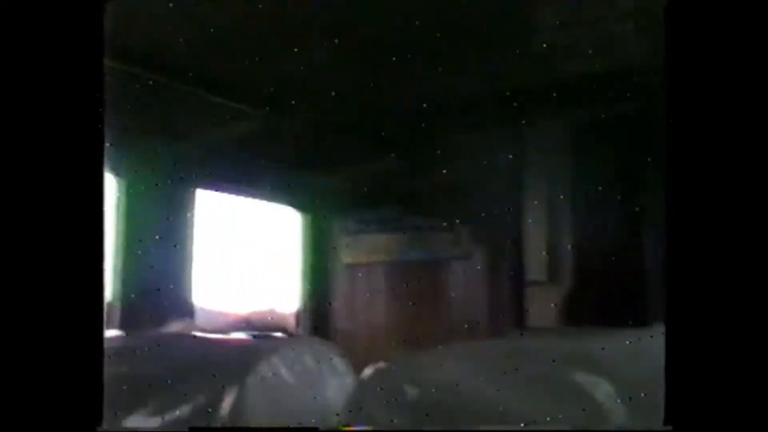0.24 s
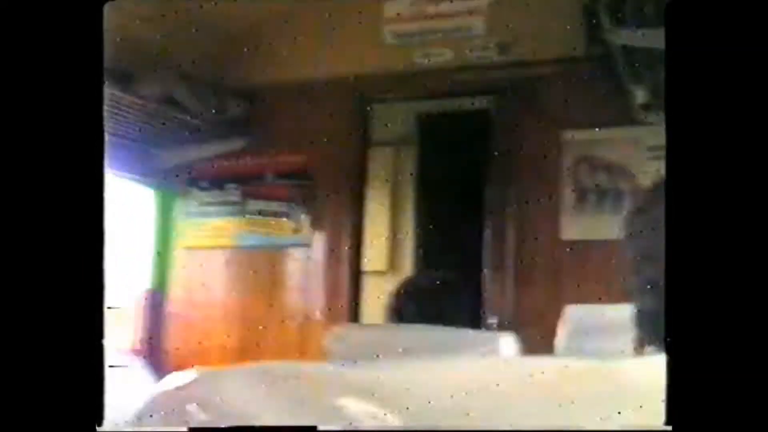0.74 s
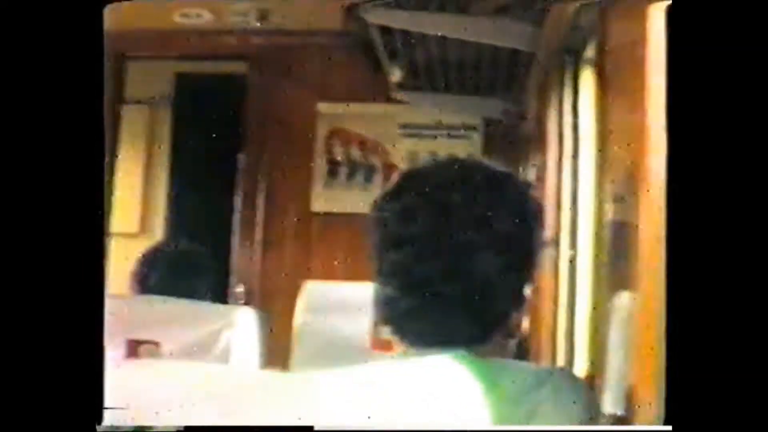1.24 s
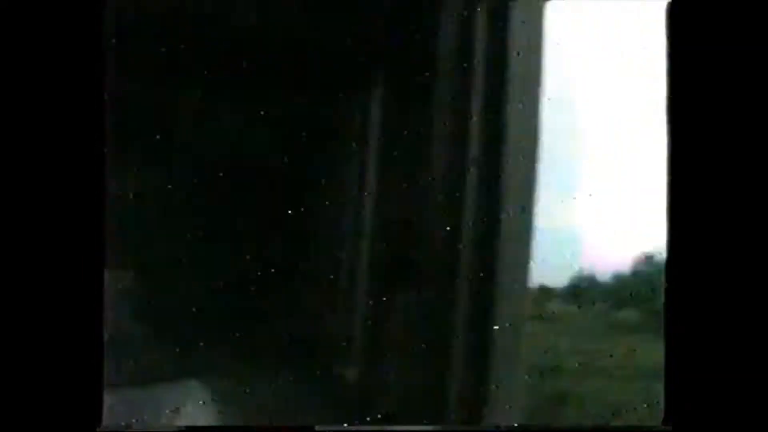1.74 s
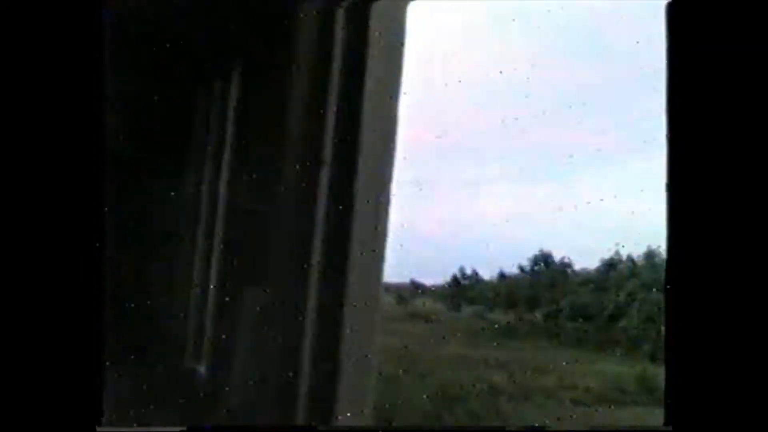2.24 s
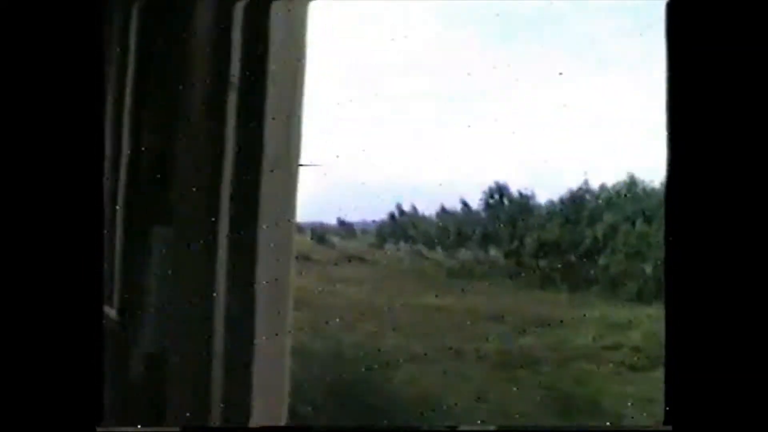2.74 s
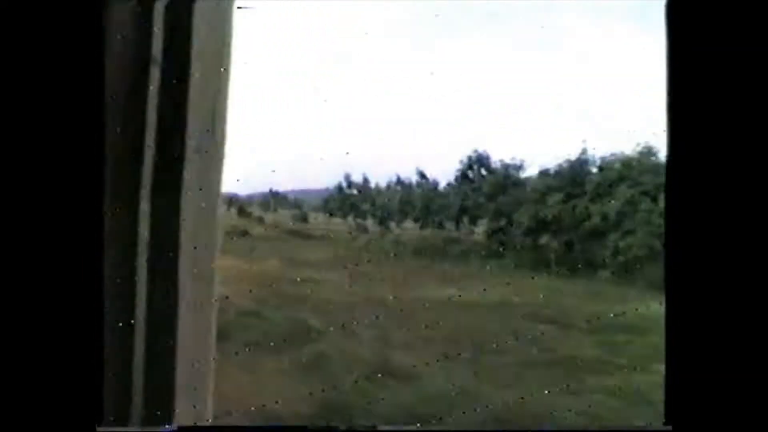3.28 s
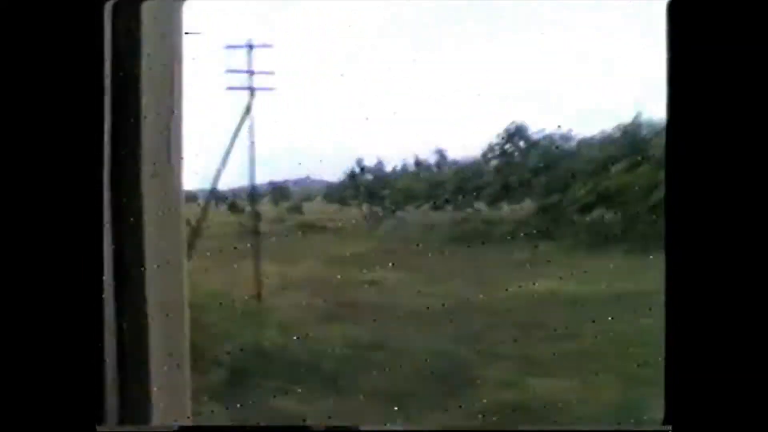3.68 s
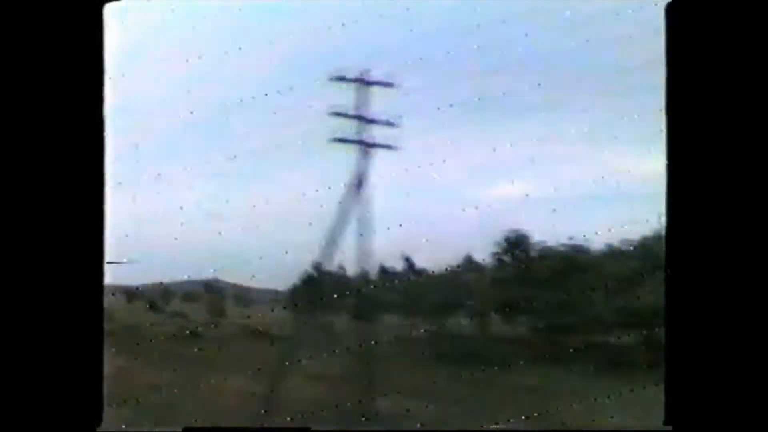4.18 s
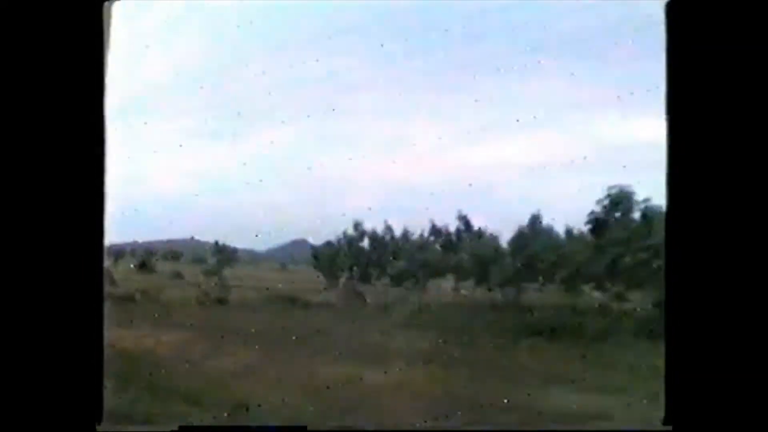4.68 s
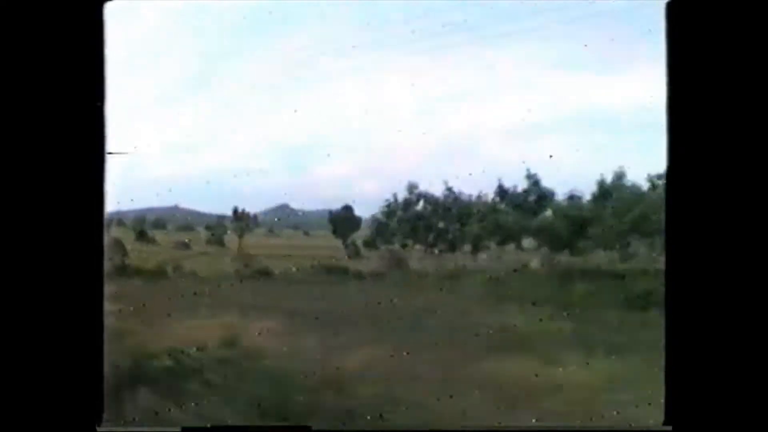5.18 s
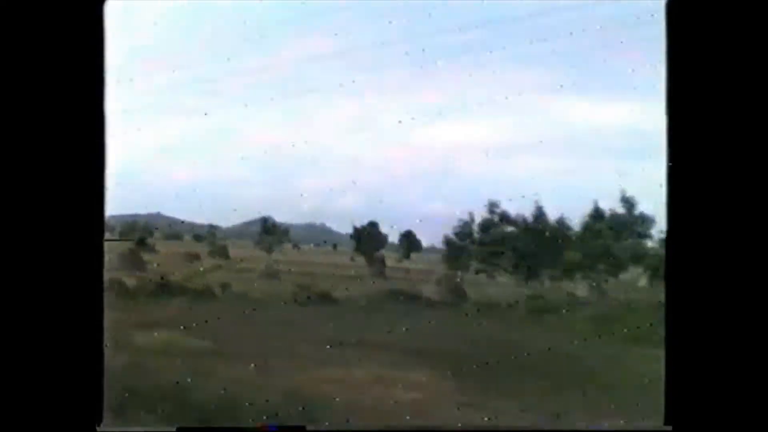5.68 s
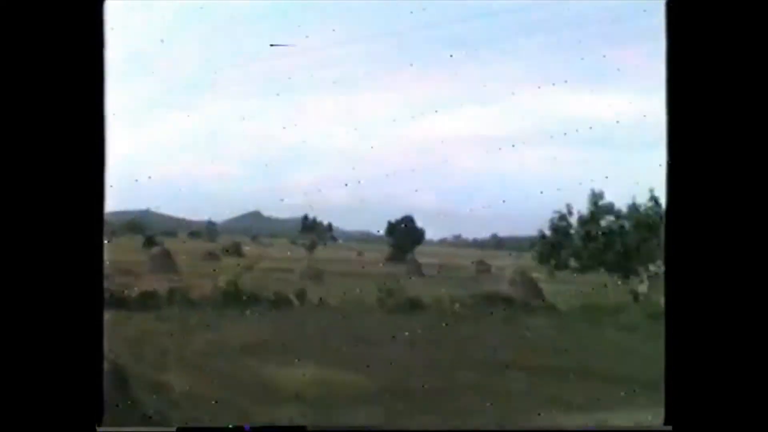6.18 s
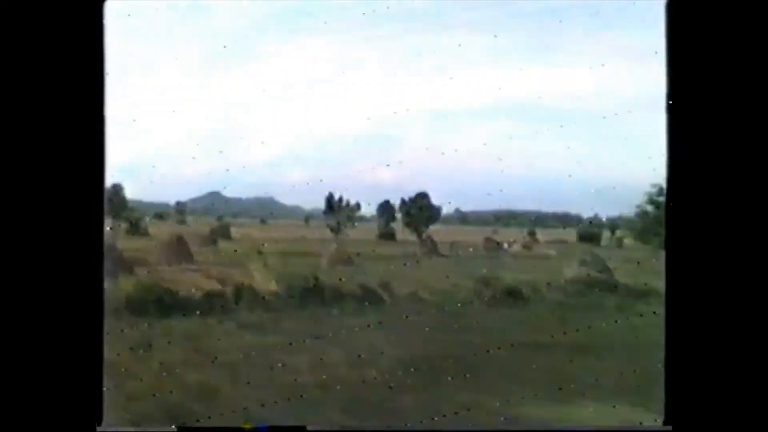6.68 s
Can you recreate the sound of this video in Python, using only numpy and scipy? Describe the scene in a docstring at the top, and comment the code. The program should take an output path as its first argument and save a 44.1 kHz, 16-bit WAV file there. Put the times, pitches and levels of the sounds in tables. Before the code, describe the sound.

Heard inside a passenger train at steady speed: a hollow mid-low drone wavers over patchy wheel roar, with rushing air hissing at the window. Short, dull wind thumps strike the handheld microphone. After about five seconds the drone recedes and outside roar brightens; a hollow surge swells and drops abruptly, followed by a cluster of gusts. Faint tape hiss underneath.

```python
"""In a passenger train at steady speed, a camcorder moves from the aisle to an open window.
The carriage drones as filtered noise, wavering panel notes and a standing wave; the wheels roar as
patchy noise with resonances, and the slipstream hisses past the window frame as turbulent noise.
Sine and noise bursts make gusts thump the microphone; a hollow band of the roar flares up once.
At the window the drone gives way to the brighter sound from outside; faint tape hiss and a whistle remain."""
import sys
import numpy as np
from scipy import signal
from scipy.fft import rfft, irfft, next_fast_len
from scipy.io import wavfile
from scipy.ndimage import uniform_filter1d, map_coordinates

SR = 44100
rng = np.random.default_rng(int(sys.argv[2]) if len(sys.argv) > 2 else 0)


def wav_record(signal):
    """Record a signal, one row per channel, as 16-bit PCM in the file named by sys.argv[1]."""
    frames = np.transpose(np.atleast_2d(signal))
    bounded = np.clip(frames, -1, 1)
    # unit amplitude maps onto the largest positive 16-bit level
    quanta = np.round(bounded * 32767).astype(np.int16)
    wavfile.write(sys.argv[1], SR, quanta)


N = 305172
TIME = np.arange(N) / SR


def amp(db):
    """Decibel law: level to amplitude gain."""
    return 10 ** (np.asarray(db) / 20)


def unit(x):
    """Normalisation: scale to rms 1."""
    return x / np.sqrt(np.mean(x ** 2) + 1e-20)


def curves(rows):
    """Linear interpolation: one value per sample for each column after the time."""
    times, *columns = np.transpose(rows)
    return [np.interp(TIME, times, column) for column in columns]


def wobble(rate):
    """Slow random fluctuation: a smooth curve through `rate` random knots a second."""
    knots = rng.standard_normal(int(N * rate / SR) + 4)
    return map_coordinates(knots, [TIME * rate])


def bell(s, length):
    """Gaussian envelope: a smooth rise and fall around time s, peak 1."""
    shape = np.zeros(N)
    near = np.abs(TIME - s) < 2 * length
    shape[near] = np.exp(-np.pi * ((TIME[near] - s) / length) ** 2)
    return shape


def filtered(x, response):
    """Linear filtering: the spectrum of x times a response of frequency."""
    size = next_fast_len(N + 8192)
    spectrum = rfft(x, size) * response(np.fft.rfftfreq(size, 1 / SR))
    return irfft(spectrum, size)[:N]


def coloured(x, spectrum):
    """Spectral shaping: x follows (f/Hz, level/dB) points on a log axis, at rms 1."""
    f, db = np.transpose(spectrum)
    return unit(filtered(x, lambda hz: amp(np.interp(np.log(hz + 1), np.log(f), db))))


def steadied(x, even_s):
    """Envelope division: x with its level evened out over even_s seconds, at about rms 1."""
    power = uniform_filter1d(x ** 2, size=int(even_s * SR))
    return x / np.sqrt(np.abs(power) + 1e-12)


def turbulence(patchy_db):
    """Turbulent intermittency: white noise with patches of random gain in time and frequency."""
    z = signal.stft(rng.standard_normal(N), nperseg=512)[2]
    field = uniform_filter1d(rng.standard_normal(z.shape), size=9, axis=0)  # across frequency
    field = uniform_filter1d(field, size=12, axis=1)  # along time
    return signal.istft(z * amp(patchy_db * unit(field)), nperseg=512)[1][:N]


# listening position: t/s, share of the sound that comes straight from outside (0-1)
OUTSIDE_SHARE = [(0, 0.17), (1, 0), (2.5, 0.32), (3.4, 0.1), (4, 0.07), (4.8, 0.13), (5.2, 0.78),
                 (5.55, 0.83), (6.9, 0.82)]


def by_position(inside, window):
    """Linear mixing: blend the value in the aisle into the value at the open window."""
    share = np.clip(curves(OUTSIDE_SHARE)[0], 0, 1)
    return (1 - share) * inside + share * window


def ringing(modes):
    """Resonance: narrow modes, each driven by its own noise."""
    total = np.zeros(N)
    for mode_hz, width_hz, inside_db, window_db in modes:
        def resonance(hz):
            damping = 1j * hz * width_hz
            return (damping / (mode_hz ** 2 - hz ** 2 + damping)) ** 2
        ring = unit(filtered(rng.standard_normal(N), resonance))
        total += ring * by_position(amp(inside_db), amp(window_db))
    return total


def wavering(pitch_hz, wander_hz, wander_per_s, swing_db, swing_per_s):
    """Frequency and amplitude modulation: one partial of rms 1 strays in pitch, swells and fades."""
    phase = 2 * np.pi * np.cumsum(pitch_hz + wander_hz * wobble(wander_per_s)) / SR
    return unit(np.sin(phase) * amp(swing_db * wobble(swing_per_s)))


# spectrum of the tape hiss: f/Hz, relative level per Hz/dB
TAPE_SPECTRUM = [(2000, -6), (9000, 1), (11000, 1), (12000, -2.5), (14000, -12), (15800, -13)]


def electronics(tape_db=-58.5, whistle_db=-81, line_hz=15625):
    """Electronic self-noise: an even tape hiss and the thin sine whistle of the camcorder's line scan."""
    whistle = amp(whistle_db) * np.sin(2 * np.pi * line_hz * TIME)
    return whistle + amp(tape_db) * coloured(rng.standard_normal(N), TAPE_SPECTRUM)


# spectra of the low churn and of the hollow, higher puff: f/Hz, relative level per Hz/dB
CHURN_SPECTRUM = [(12, -48), (22, -31), (35, -10), (60, -4), (92, -2.5), (120, 1.5), (160, -2.5),
                  (350, -13), (1000, -56), (3000, -110)]
PUFF_SPECTRUM = [(15, -45), (35, -12), (70, -15), (120, -4), (165, 1.5), (215, -2), (350, -7), (1000, -52),
                 (3000, -110)]
# gusts on the microphone: peak t/s, reference level/dB, length of the bell before squaring/s,
# share of the hollow puff (0-1), thump f/Hz
GUSTS_AT_MIC = [(0.983, -30, 0.053, 0.57, 80), (1.366, -27.5, 0.034, .05, 100), (2.74, -26, 0.08, 0.21, 97),
                (2.785, -36, .04, 0.35, 130), (2.829, -30, .06, .4, 88), (2.885, -40, .05, .4, 80),
                (2.964, -28, 0.056, 0.72, 76), (3.14, -40, .057, .3, 85), (3.59, -33, .04, .45, 85),
                (3.645, -38.5, .04, .2, 62), (3.736, -34.5, .042, .3, 75), (3.997, -28, .05, 0.62, 90.4),
                (4.55, -43, 0.13, 0.23, 85), (4.735, -43, 0.059, .1, 80), (4.934, -35.5, .042, 0.49, 85),
                (5.056, -32, .053, 0.94, 90), (5.612, -42, .046, .2, 80), (6.322, -29.5, .08, .1, 108),
                (6.368, -36, 0.041, .2, 95), (6.405, -28, 0.042, 0.18, 85), (6.445, -35, .04, .1, 90),
                (6.484, -29.5, .04, 0.11, 98), (6.517, -29, .045, 0.12, 82), (6.59, -45, 0.079, .2, 80),
                (6.792, -40.5, .085, .05, 92)]


def gusts(stir_db=-54, stir_swing_db=3.0, even_s=.02, push_db=-2, churn_db=-5,
          wake_db=-18, wake_lag_s=0.024, wake_s=0.083):
    """Wind-induced pressure: eddies thump the microphone, deep or hollow, over a faint stir that never stops
    but wavers in level."""
    churn = steadied(coloured(rng.standard_normal(N), CHURN_SPECTRUM), even_s)
    puff = steadied(coloured(rng.standard_normal(N), PUFF_SPECTRUM), even_s)
    total = churn * amp(stir_db + stir_swing_db * wobble(8.5))
    start_turns = rng.random(len(GUSTS_AT_MIC))  # random phase, as a fraction of a cycle
    for (s, db, length, hollow, hz), turn in zip(GUSTS_AT_MIC, start_turns):
        share = np.clip(hollow, 0, 1)
        push = np.sqrt(2) * np.sin(2 * np.pi * (hz * TIME + turn))  # rms 1
        thud = amp(push_db) * push + amp(churn_db) * churn
        mixture = np.sqrt(1 - share) * thud + np.sqrt(share) * puff
        thump = bell(s, length) ** 2 * mixture
        wake = amp(wake_db) * bell(s + wake_lag_s, wake_s) * churn
        total += amp(db) * (thump + wake)
    return total


# resonances of the flare: f/Hz, width/Hz, relative level inside/dB, relative level at the window/dB
FLARE_RESONANCES = [(1069, 240, 3, 1.5), (1960, 480, -13, -10), (2644, 810, -15, -19)]


def flare(peak_s=5.63, rise_s=0.17, fall_s=.03, base_db=-34.5, crest_db=4, crest_s=0.029):
    """Exponential growth and decay: a hollow band near 1 kHz climbs, crests sharply and drops away."""
    age = TIME - peak_s
    envelope = np.exp(np.where(age < 0, age / rise_s, -age / fall_s))
    level = amp(base_db + crest_db * bell(peak_s, crest_s))
    return level * envelope * ringing(FLARE_RESONANCES)


# spectra of the rush, and of the hiss inside and at the window: f/Hz, relative level per Hz/dB
RUSH_SPECTRUM = [(400, -27), (1400, 2.5), (2000, 2), (2500, 1), (3300, -1), (4400, -1.5), (4950, -4),
                 (5600, -7), (6500, -8.5), (10000, -22.5), (15000, -43)]
HISS_SPECTRUM_INSIDE = [(2500, -13), (4900, -5), (5500, 0.5), (6300, 0), (7200, -1.5), (8400, -4.5),
                        (9200, -6), (10800, -12.5), (12000, -24), (14000, -36)]
HISS_SPECTRUM_WINDOW = [(2500, -28), (4800, -11), (5400, 0), (6150, 2), (7000, -3.5), (8100, 1),
                        (9200, -5.5), (10500, -10), (12000, -22), (14000, -40)]
# ringing of the window frame: f/Hz, width/Hz, level over the hiss inside/dB, the same at the window/dB
FRAME_RESONANCES = [(6290, 380, -7.5, -12), (8200, 720, -9, -11)]
# change added to those frame levels: t/s, level/dB
FRAME_RING_LEVEL = [(0, -3), (.7, -8), (1.1, -3), (1.3, 2), (1.6, 1), (1.8, 6), (1.98, 3.5), (2.15, -14),
                    (2.45, 5), (2.9, 0), (3.15, 6.5), (3.35, -3), (3.7, 0), (4.05, 5), (4.2, -7),
                    (4.7, -11), (5.0, 5.5), (5.5, -2), (6.0, -15), (6.92, -5)]
# reference levels before draught and swells: inside level/dB, window level/dB
RUSH_LEVELS = (-47, -45)
HISS_LEVELS = (-52.5, -49.5)


def slipstream(draught_db, swell_db, rush_follows=0.73, flutter_db=0.83, waver_db=2, hiss_swells=0.81):
    """Aerodynamic noise: air past the window makes a broad, fluttering rush and a hiss ringing off the frame."""
    rush = coloured(turbulence(patchy_db=0.73), RUSH_SPECTRUM)
    rush_db = by_position(*RUSH_LEVELS) + rush_follows * draught_db  # dB per dB of draught
    rush_db = rush_db + swell_db + flutter_db * wobble(40)
    eddies = turbulence(patchy_db=2.0)
    hiss = by_position(coloured(eddies, HISS_SPECTRUM_INSIDE), coloured(eddies, HISS_SPECTRUM_WINDOW))
    ring = ringing(FRAME_RESONANCES) * amp(curves(FRAME_RING_LEVEL)[0] + waver_db * wobble(14))
    edge_db = by_position(*HISS_LEVELS) + draught_db + hiss_swells * swell_db
    return rush * amp(rush_db) + (hiss + ring) * amp(edge_db)


# spectra of the roar inside and at the window: f/Hz, relative level per Hz/dB
ROAR_SPECTRUM_INSIDE = [(150, -22), (450, 1.5), (660, 3), (820, -1.5), (1020, -2.5), (1300, -10.5),
                        (1650, -18), (2300, -25.5), (4000, -32.5), (9000, -70)]
ROAR_SPECTRUM_WINDOW = [(150, -27), (450, 0), (680, 4.5), (850, 3), (1100, -3.5), (1400, -7.5), (1700, -13),
                        (2300, -26), (4000, -35), (9000, -70)]
# ringing of the wheels: f/Hz, width/Hz, level over the roar inside/dB, the same at the window/dB
WHEEL_RESONANCES = [(662, 54, -14, -7), (1064, 140, -28, -12), (1390, 240, -21, -20.5),
                    (1997, 130, -28, -22), (3350, 470, -50, -23)]
# reference level before swells and judder: inside level/dB, window level/dB
ROAR_LEVELS = (-33, -32)


def wheels(swell_db, judder_db=0.5):
    """Rolling contact excitation: steel on steel makes a juddering roar, with the ringing of the wheel discs."""
    contact = turbulence(patchy_db=0.87)
    roar = by_position(coloured(contact, ROAR_SPECTRUM_INSIDE), coloured(contact, ROAR_SPECTRUM_WINDOW))
    level_db = by_position(*ROAR_LEVELS) + swell_db + judder_db * wobble(28)
    return (roar + ringing(WHEEL_RESONANCES)) * amp(level_db)


# strength of the draught through the window: t/s, relative level/dB
DRAUGHT_LEVEL = [(0, -3), (.25, 3), (.6, -3.5), (.78, 1), (.9, -1), (1.7, 1), (2.1, 0), (2.6, 0),
                 (3.45, -1), (4.2, 1), (4.75, 0.5), (5.3, -3), (5.8, -1), (6.0, 3.5), (6.35, -.3),
                 (6.55, 0.5), (6.66, 3.5), (6.92, 5.5)]
# wheel roar over its steady level as the track gets rougher or smoother: t/s, level/dB
TRACK_ROUGHNESS = [(0, 1), (.65, 0.4), (.95, 4), (1.6, -0.5), (1.9, 1.5), (2.45, 0.9), (3.2, 0), (4.0, 0),
                   (4.5, 1), (5.15, -2), (5.5, 0.5), (5.8, 0.5), (6.1, 0), (6.4, 0), (6.75, 1.5),
                   (6.92, 0.5)]
# brief swells (+) and lulls (-) of the outside noise: t/s, length/s, wheel roar level/dB, air level/dB
OUTSIDE_SWELLS = [(0, 0.025, 9, 7), (0.532, .05, -2, 0), (.765, 0.052, -7, -3.5), (.83, 0.026, 0, 2),
                  (0.889, 0.07, 1, 6.5), (1.054, 0.07, 2, 5.3), (1.2, .031, -1, 6), (1.292, .04, 0, 3.5),
                  (1.426, .12, 0.5, -1), (1.542, 0.026, 1, 5), (1.822, 0.057, 4.5, 5), (2.2, 0.089, 1, 3.5),
                  (2.27, 0.024, 3, 3), (2.33, 0.084, -4.5, -3), (2.45, 0.054, 3.5, 1), (2.586, .05, 4, 4.5),
                  (2.712, 0.036, 1.5, 3), (2.892, 0.056, 5, 2.5), (2.929, .025, 2.5, 4),
                  (3.02, .039, -6.5, -3.5), (3.1, 0.035, -3, 2), (3.19, .04, 2.5, 2), (3.268, 0.043, 4, 1),
                  (3.528, 0.047, -8, -4), (3.666, 0.096, 4, 1.5), (3.785, .034, 1, 1.5),
                  (3.855, .05, -5, -3), (3.99, .07, -5, -1.5), (4.541, 0.023, 5.5, 2),
                  (4.77, .07, -2.5, -2.5), (5.22, .09, -0.5, -1), (5.565, 0.059, .5, 1),
                  (5.638, 0.048, 2.5, 6), (6.003, 0.029, 4.5, -1), (6.089, 0.022, 2.5, -2),
                  (6.174, 0.034, 3.8, 2.5), (6.49, .07, 1, 1.5), (6.657, 0.061, 2.5, 4),
                  (6.747, .05, 0, -1), (6.83, 0.028, 2, 0), (6.897, .026, 5, -1)]


def outside(unsteady_db=0.04, unsteady_hz=14):
    """Superposition: wheel roar and air noise add, each with timed swells and a shared slight unsteadiness."""
    draught_db, = curves(DRAUGHT_LEVEL)
    track_db, = curves(TRACK_ROUGHNESS)
    shared_db = unsteady_db * wobble(unsteady_hz)
    roar_db = shared_db + sum(db * bell(s, length) for s, length, db, _ in OUTSIDE_SWELLS)
    air_db = shared_db + sum(db * bell(s, length) for s, length, _, db in OUTSIDE_SWELLS)
    return wheels(track_db + roar_db) + slipstream(draught_db, air_db)


# strongest standing wave in the carriage: t/s, mean f/Hz, level relative to the drone/dB
STANDING_WAVE = [(0, 304, -7), (.5, 305.8, -10), (.9, 319, -6.5), (1.25, 315.4, -15), (1.55, 304.2, -8),
                 (2.0, 297.9, -12), (2.75, 302.3, -10), (3.15, 317.4, -3.5), (3.5, 304.8, -13),
                 (3.9, 305, -5), (4.08, 289, -10.5), (4.35, 299, -7), (4.65, 290.3, -6.5), (4.9, 304, -14),
                 (5.12, 315.6, -3.5), (5.6, 314.7, -16.5), (6.92, 313.8, -11.5)]


def standing_wave():
    """Standing wave: the air between the walls hums on one note that strays in pitch and swells."""
    pitch_hz, level_db = curves(STANDING_WAVE)
    hum = wavering(pitch_hz, wander_hz=5.965, wander_per_s=16, swing_db=3, swing_per_s=22)
    return hum * amp(level_db)


# floor and wall panels: f/Hz, pitch wander/Hz, level relative to the drone inside/dB, at the window/dB
PANEL_RESONANCES = [(210.6, 9, -24.5, -22), (272, 10, -14, -28), (346.3, 9, -10.5, -21),
                    (391, 10.02, -11, -10.5), (436.7, 11.05, -14, -10), (495, 8.16, -18.5, -15)]


def panels():
    """Plate modes: each panel sings in short, wavering surges of its own."""
    total = np.zeros(N)
    for hz, stray_hz, inside_db, window_db in PANEL_RESONANCES:
        note = wavering(hz, stray_hz, wander_per_s=20, swing_db=4.5, swing_per_s=14)
        total += note * by_position(amp(inside_db), amp(window_db))
    return total


# spectra of the boom inside and at the window: f/Hz, relative level per Hz/dB
BOOM_SPECTRUM_INSIDE = [(15, -60), (45, -33), (92, -28), (140, -20), (205, -8), (255, -1), (305, 1),
                        (360, -0.5), (440, -2.5), (495, -4), (560, -12), (750, -16.5), (1500, -29),
                        (4000, -71)]
BOOM_SPECTRUM_WINDOW = [(15, -55), (50, -28), (100, -34), (160, -22), (240, -9), (305, -2), (370, 0),
                        (440, 2), (560, -8), (750, -22), (1500, -39), (4000, -82)]
# reference level of the carriage drone before its brief rises and dips: t/s, level/dB
DRONE_LEVEL = [(0, -24), (1.0, -24.5), (1.7, -25.5), (2.5, -23.5), (2.85, -24.5), (3.3, -25), (3.8, -23),
               (4.5, -25), (5.1, -25), (5.42, -27.5), (6.1, -27), (6.35, -29), (6.55, -28.5), (6.92, -25.5)]
# brief rises (+) and dips (-) in the level of the drone: t/s, length/s, level/dB
DRONE_RISES = [(.2, 0.052, -3.5), (0.787, 0.06, -3), (1.25, 0.17, 0), (1.562, 0.041, 2.5),
               (1.862, .06, 2.5), (1.933, 0.041, -3), (2.214, .06, 1.5), (2.33, 0.063, -2), (2.6, 0.061, 2),
               (2.888, .04, -1.5), (3.03, 0.053, -4.5), (3.3, 0.087, 1), (3.49, 0.069, 1),
               (3.608, 0.066, -2), (3.678, .06, 1.5), (3.744, 0.032, -5), (3.88, 0.11, 0),
               (4.06, 0.071, -2), (4.638, .073, 2), (5.25, 0.055, -2.5), (5.336, 0.065, 2),
               (5.622, 0.07, 4), (6.12, 0.054, -3.5), (6.25, .09, 4)]


def carriage(even_s=.05, boom_db=-1):
    """Cabin resonance: steady noise booms around 300-450 Hz, with wavering panel notes and a standing wave."""
    rise_db = sum(db * bell(s, length) for s, length, db in DRONE_RISES)
    drone_db = curves(DRONE_LEVEL)[0] + rise_db
    noise = rng.standard_normal(N)
    boom = by_position(coloured(noise, BOOM_SPECTRUM_INSIDE), coloured(noise, BOOM_SPECTRUM_WINDOW))
    body = amp(boom_db) * steadied(boom, even_s)
    return (body + panels() + standing_wave()) * amp(drone_db)


def scene():
    """Superposition: all the sound at the single microphone."""
    return (gusts() + flare() + outside() + carriage())[None]


def record(dry, knee_db=-20, response_s=0.014, makeup_db=0.72, added_bass_db=6, bass_hz=140, top_hz=15750):
    """Gain control: loud swells, bass thumps most, are turned down; nothing passes above the band limit."""
    keep = np.exp(-1 / (response_s * SR))
    bass = filtered(dry[0], lambda hz: 1 / (1 + (hz / bass_hz) ** 8))
    sensed = dry[0] + amp(added_bass_db) * bass  # the level detector hears extra bass
    power = signal.lfilter([1 - keep], [1, -keep], sensed ** 2)
    over_knee = power / amp(knee_db) ** 2
    gain = amp(makeup_db) / np.sqrt(np.sqrt(1 + over_knee ** 2))
    return filtered(dry[0] * gain + electronics(), lambda hz: hz < top_hz)[None]


dry = scene()
out = record(dry)
wav_record(out)
```